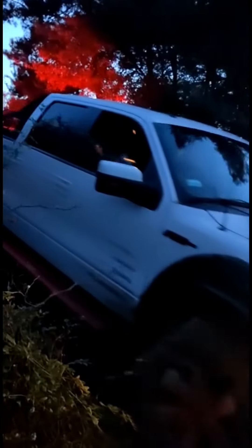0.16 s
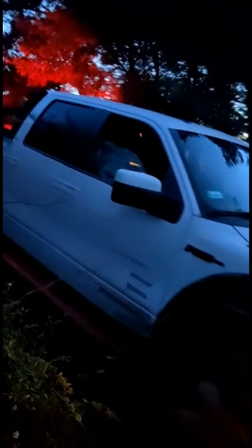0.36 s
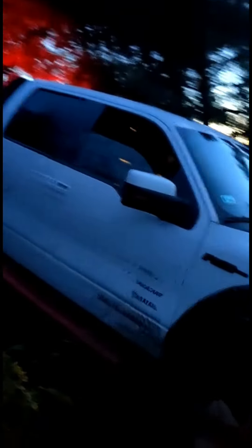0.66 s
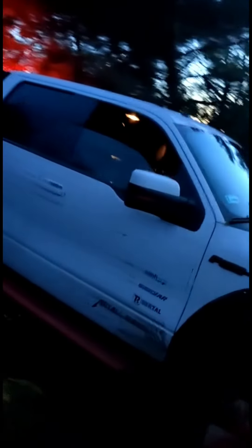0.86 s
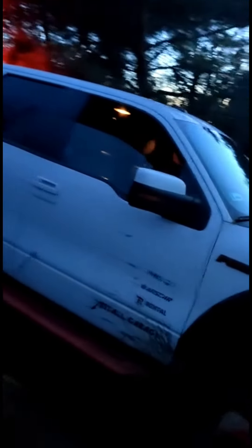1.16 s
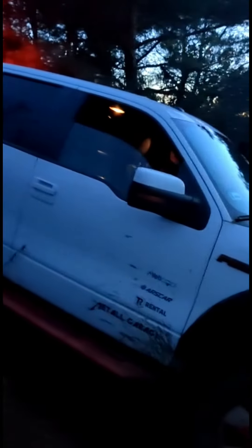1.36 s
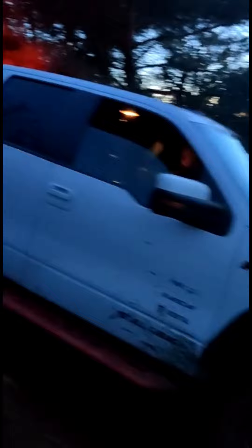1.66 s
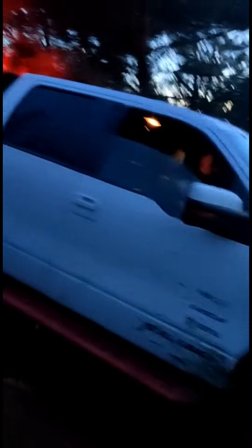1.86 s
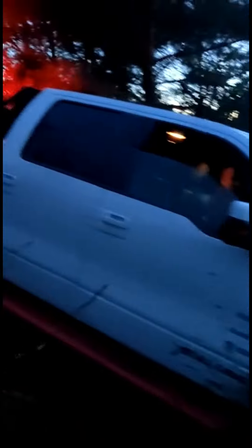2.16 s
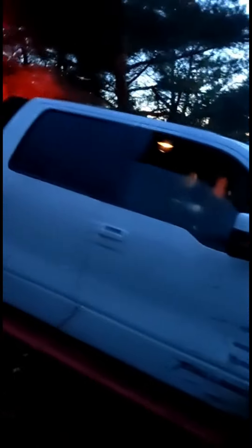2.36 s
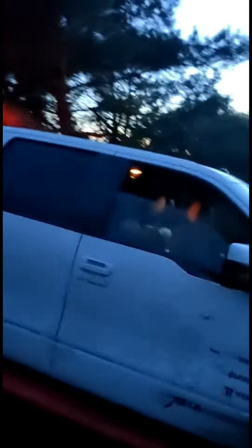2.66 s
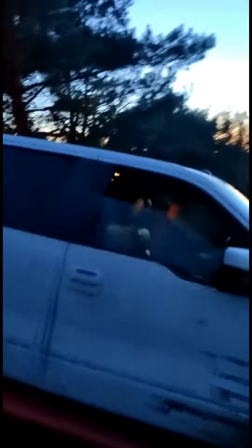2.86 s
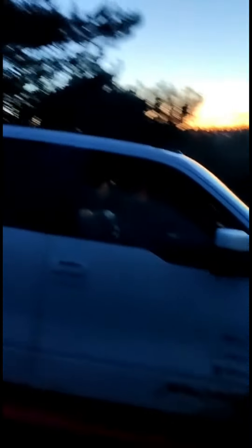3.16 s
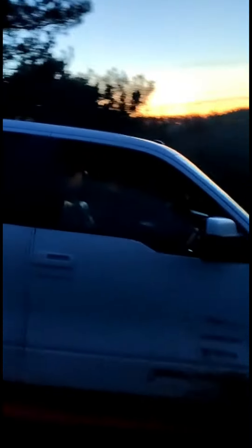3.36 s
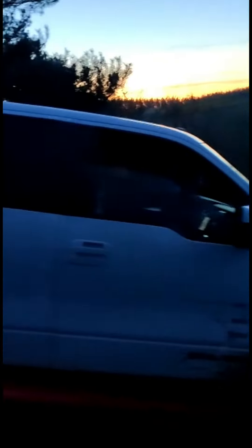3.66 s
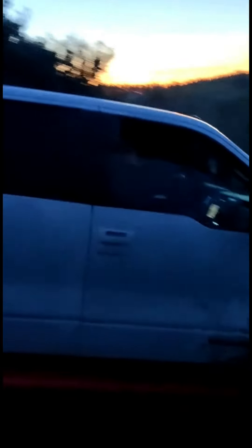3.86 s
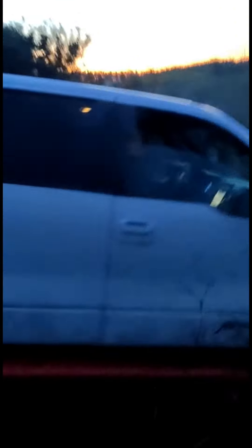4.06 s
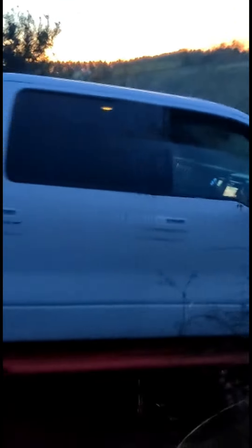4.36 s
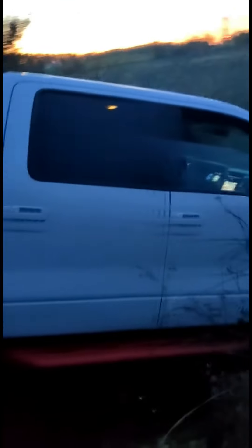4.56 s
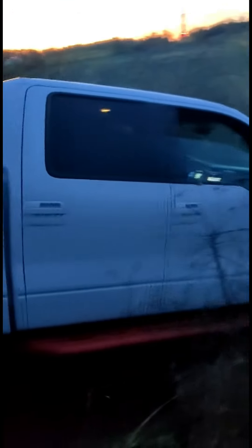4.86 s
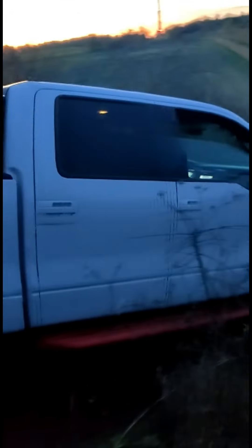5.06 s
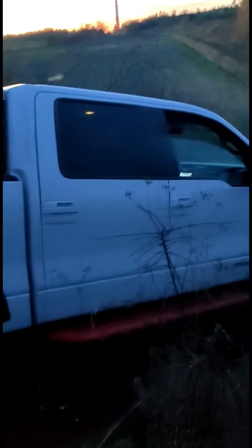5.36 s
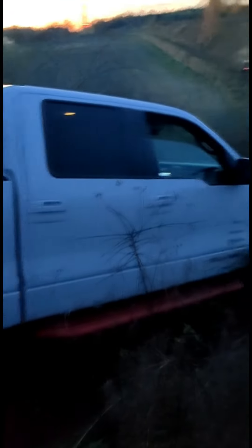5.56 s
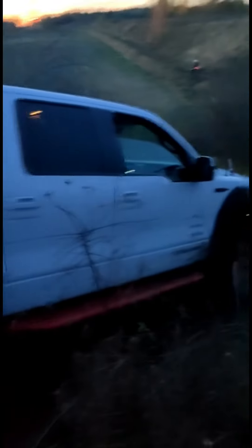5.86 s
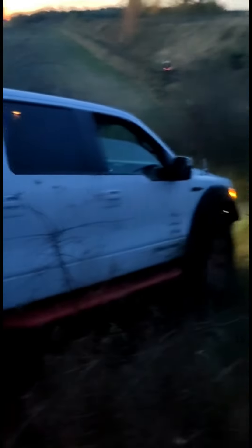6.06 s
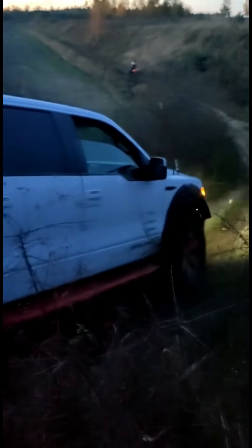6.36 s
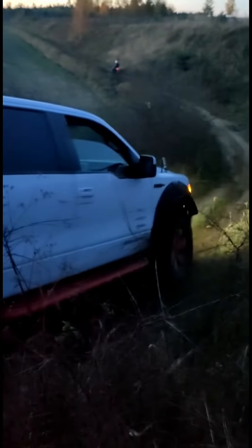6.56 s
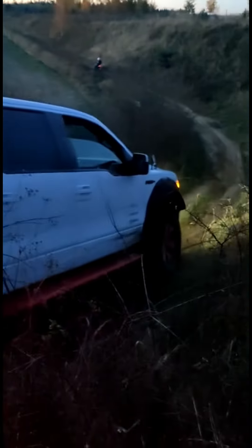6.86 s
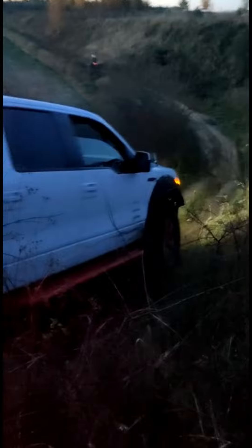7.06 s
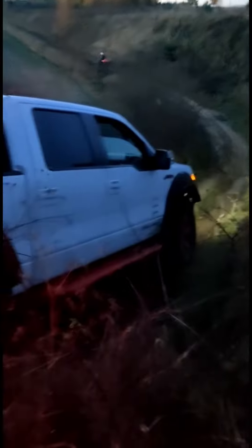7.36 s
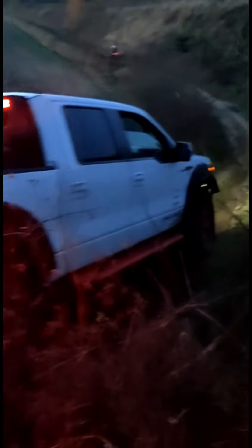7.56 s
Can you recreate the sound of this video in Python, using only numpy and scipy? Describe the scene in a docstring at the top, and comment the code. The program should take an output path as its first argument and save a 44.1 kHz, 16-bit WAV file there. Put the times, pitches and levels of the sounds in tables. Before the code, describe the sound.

Deep uneven truck engine throb swells and sags close by over soft hiss, with sharp twig cracks, grass swish and dull body knocks.

```python
"""A lumpy engine buzz and boom swells and sags over hiss, rustling grass, snapping twigs and body knocks.
A cross-plane V8 pickup creeps through brush a few metres from a phone, its idle hunting up and down.
Even firings make harmonics of the firing rate; the uneven order of the two banks rings the muffler.
Filtered noise makes gas, fan and grass; cracks, scrapes and rings make twigs; decaying modes make knocks."""
import sys
import numpy as np
from scipy import signal
from scipy.fft import rfft, irfft, next_fast_len
from scipy.io import wavfile
from scipy.ndimage import uniform_filter1d

SR = 44100
rng = np.random.default_rng(int(sys.argv[2]) if len(sys.argv) > 2 else 0)


def file_out(sig):
    """Save sig as 16-bit WAV at sys.argv[1]."""
    # one column per channel
    cols = np.atleast_2d(sig).T
    # limit, then scale
    lim = np.clip(cols, -1, 1)
    pcm = np.round(lim * 32767).astype(np.int16)
    wavfile.write(sys.argv[1], SR, pcm)


N = 339570
PORT_LAG = 9  # delay between the two microphone ports, samples
IDLE_HZ = 4.5  # reference engine speed, cycles of two crank turns a second


def undb(db):
    """Amplitude ratio: twenty decibels make a factor of ten."""
    return 10 ** (np.asarray(db) / 20)


def level(x, db):
    """Energy normalisation: the root mean square is set to a level in dB."""
    return x * undb(db) / np.sqrt(np.mean(x ** 2))


def curves(table):
    """Linear interpolation: the columns of a table joined by straight lines in time."""
    s, *columns = np.transpose(table)
    return [np.interp(np.arange(N) / SR, s, c) for c in columns]


def at(table, hz):
    """Spectral envelope: a table of (hz, value) read on a log-frequency axis."""
    table_hz, value = np.transpose(table)
    return np.interp(np.log(hz + 1), np.log(table_hz), value)


def band(x, hz, width_hz):
    """Second-order resonance with gain 1 at its centre."""
    b, a = signal.iirpeak(hz, hz / width_hz, SR)
    return signal.lfilter(b, a, x)


def walk(rate):
    """Slow random modulation: levels held 1 / rate s and slewed twice; spread near 1."""
    k = int(SR / rate)
    steps = np.repeat(rng.standard_normal(N // k + 1), k)
    return 1.62 * uniform_filter1d(uniform_filter1d(steps, k), k)[:N]


def pan(x, db):
    """Level and time difference: left minus right in dB; left lags unless it is at least 3 dB louder."""
    lag = PORT_LAG if db < 3 else -PORT_LAG
    return np.array([np.roll(x, lag) * undb(db / 2), x * undb(-db / 2)])


def coloured(tone, flicker_db, likeness=None, gate=1):
    """Subtractive synthesis: shaped noise whose octave slices each flicker over a shared swell."""
    size = next_fast_len(N)
    hz = np.arange(size // 2 + 1) * SR / size
    common, left, right = rfft(rng.standard_normal((3, size)))
    # share of the power common to both ports
    share = np.clip(at(likeness, hz), 0, 1) if likeness else 1
    late = np.exp(-2j * np.pi * hz * PORT_LAG / SR)
    pair = np.array([common * late, common]) * np.sqrt(share) + np.array([left, right]) * np.sqrt(1 - share)
    pair = pair * undb(at(tone, hz))
    slices = np.floor(np.log2(hz + 1)).astype(int).clip(7, 13)
    swell = walk(3.116)
    out = 0
    for k in range(7, 14):
        flicker = undb(flicker_db * (.4 * swell + walk(14)))
        out = out + irfft(pair * (slices == k), size)[:, :N] * flicker
    return level(out * gate, 0)


def engine_cycle():
    """Rotational inertia: the flywheel smooths the speed, whose integral is the position in the cycle."""
    # engine speed before the flywheel smooths it: start_s, speed_hz (cycles of two crank turns a second)
    speed_table = [(0.0, 4.928), (0.6, 4.732), (1.2, 4.031), (1.5, 3.937), (1.75, 4.199), (2.3, 4.771),
                   (2.6, 4.923), (3.5, 4.457), (3.95, 4.44), (4.45, 4.746), (4.8, 4.632), (5.1, 4.583),
                   (5.5, 4.128), (5.75, 4.025), (6.05, 4.221), (6.5, 4.763), (6.8, 4.778), (7.2, 4.628),
                   (7.7, 4.505)]
    flywheel_s = .2
    # cycle position runs ahead above IDLE_HZ and behind below it, making speed changes a little livelier
    speed_lead_s = .011
    speed = uniform_filter1d(curves(speed_table)[0], size=int(flywheel_s * SR), mode="nearest")
    return speed, np.cumsum(speed) / SR + speed_lead_s * (speed - IDLE_HZ)


def buzz_and_drone(firing, lift_db, second_db):
    """Fourier series: even firings sound at whole multiples of the firing rate, locked to crank angle."""
    # buzz at multiples of the firing rate: multiple, relative_db
    multiples = [(2, 4.5), (3, -3.5), (4, 0), (5, -21)]
    # tone at the firing rate falls behind as the truck's tail swings round: start_s, late_rad
    drone_late = [(0, .1), (4, .3), (6.3, 1.05), (7.7, .85)]
    # tones of the exhaust: start_s, buzz_db, drone_db
    tone_levels = [(0.0, -30, -30), (0.83, -29, -27), (0.96, -29, -34), (1.22, -33, -27), (1.63, -38, -34),
                   (1.97, -31.5, -36), (2.36, -29.5, -23.5), (3.11, -30.5, -25.5), (3.26, -28, -27.5),
                   (4.1, -31, -32.5), (4.22, -32.5, -26.5), (4.57, -26, -23), (4.95, -32.5, -26.5),
                   (5.42, -28.5, -26.5), (5.83, -37, -30), (6.37, -26, -24), (7.57, -32.5, -25.5),
                   (7.7, -28, -25)]
    buzz_lag = 1.3  # how late the buzz peaks, radians of a firing
    buzz_db, drone_db = curves(tone_levels)
    angle = 2 * np.pi * firing - buzz_lag
    buzz = 0
    for k, db in multiples:
        multiple_db = db + lift_db * (k == 4) + second_db * (k == 2) + .6 * walk(8)
        buzz = buzz + undb(multiple_db) * np.sqrt(2) * np.sin(k * angle)
    drone = undb(drone_db) * np.sqrt(2) * np.sin(angle - curves(drone_late)[0])
    return drone + undb(buzz_db) * buzz


def firing_pulses(count):
    """Impulse excitation: one puff per firing, signed by bank, and a stray random part."""
    # bank of each firing in order: sign
    banks = [1, -1, 1, -1, -1, 1, -1, 1]
    # mean strength of each cylinder in firing order: relative_db
    cylinder_db = [1.4, 1.9, 0, -.6, -.6, -1.3, -.6, -.3]
    scatter_db = 1.3  # from firing to firing
    starts = np.flatnonzero(np.diff(count)) + 1
    chance = rng.standard_normal((2, len(starts)))
    puffs, stray = np.zeros(N), np.zeros(N)
    strength_db = np.take(cylinder_db, count[starts], mode="wrap") + scatter_db * chance[0]
    puffs[starts] = np.take(banks, count[starts], mode="wrap") * undb(strength_db)
    stray[starts] = chance[1]
    return puffs, stray


def muffler_boom(puffs):
    """Resonators in series: the uneven bank pattern rings the muffler chambers."""
    # muffler chambers: pitch_hz, width_hz
    chambers = [(61.5, 17), (76, 16)]
    boom = puffs
    for hz, width_hz in chambers:
        boom = band(boom, hz, width_hz)
    return level(boom, 0)


def shell_ring(puffs, count):
    """Once-a-cycle forcing: one cylinder rings each shell resonance, filtered twice."""
    # shell resonances: pitch_hz, filter_width_hz, level_db (relative to the boom)
    shell = [(22.3, 6.1, -17), (146, 23, -14.5)]
    # cylinder that drives each: firing_index
    drivers = [1, 4]
    # outward or inward push: sign
    pushes = [1, -1]
    out = 0
    for k, push, (hz, width_hz, db) in zip(drivers, pushes, shell):
        blow = push * np.abs(puffs) * (count % 8 == k)
        out = out + level(band(band(blow, hz, width_hz), hz, width_hz), db)
    return out


def tailpipe_ring(puffs, stray):
    """Pipe resonance: every firing, of uneven strength and sometimes reversed sign, rings the tailpipe."""
    # pipe resonances: pitch_hz, filter_width_hz (second pass twice as wide), relative_db
    pipe_modes = [(259.6, 35, -4), (328.3, 19, -8.5), (368.6, 39, -15), (477.6, 19, -12.5)]
    blows = np.abs(puffs) * undb(2 * stray) * np.sign(stray + .7)
    # a blow pushes for about a millisecond
    blows = uniform_filter1d(uniform_filter1d(blows, size=40), size=40)
    return sum(level(band(band(blows, hz, width_hz), hz, 2 * width_hz), db) for hz, width_hz, db in pipe_modes)


def stray_growl(stray):
    """Random forcing: stray firing strength excites a broad low resonance."""
    return level(band(band(stray, 179, 70), 179, 70), 0)


def exhaust(cycle, speed):
    """Source and filter: crank-locked tones and firing pulses ring muffler, shell and tailpipe."""
    # rough part, thickest as the engine pulls:
    # start_s, growl_db, tailpipe_db, fourth_multiple_lift_db, second_multiple_lift_db
    pull = [(0, -46, -47, -0.5, 0), (.6, -47, -45.5, -2, 0), (1.03, -41, -44.5, -1.5, -1),
            (1.63, -44, -47.5, 0, 3), (2.3, -39, -44, 1.5, -1), (2.64, -43, -46, 0, -1),
            (2.95, -51, -44.5, -3, -1), (3.3, -42, -45.5, -2, -1), (4.1, -45, -42.5, 1, 0),
            (4.55, -36, -41, 2, -3), (4.9, -47, -44.5, 0.5, 0), (5.3, -43, -46, -1.5, -2),
            (5.8, -52, -46, -1.5, 1), (6.15, -44, -42, 0.5, -3), (6.6, -36, -41.5, 2, -4),
            (6.95, -43.5, -46, 0.5, -3), (7.25, -50, -47, 0.5, -2), (7.7, -48, -44, -0.5, -2)]
    first_firing = .1485  # share of a cycle before the first firing
    # the boom swells with engine speed, a little late
    boom_idle_db, boom_db_per_hz, boom_late_s = -22.8, 1.5, 0.15
    t = np.arange(N) / SR
    boom_db = boom_idle_db + boom_db_per_hz * (np.interp(t - boom_late_s, t, speed) - IDLE_HZ)
    growl_db, pipe_db, lift_db, second_db = curves(pull)

    firing = 8 * (cycle - first_firing)
    count = np.floor(firing).astype(int)
    puffs, stray = firing_pulses(count)
    tones = buzz_and_drone(firing, lift_db, second_db)
    boom = (muffler_boom(puffs) + shell_ring(puffs, count)) * undb(boom_db)
    rough = stray_growl(stray) * undb(growl_db) + tailpipe_ring(puffs, stray) * undb(pipe_db)
    return pan(tones + boom + rough, -.35), firing % 1


def knocks():
    """Modal synthesis: a soft blow rings the modes of a body panel, which decay exponentially."""
    # knocks on the body: start_s, nominal_peak_db, ring_hz, t60_s
    blows = [(.592, -28, 435, 0.048), (.807, -38, 454, 0.17), (.997, -39, 794, .06),
             (1.011, -29.5, 820, 0.051), (1.2, -40, 886, 0.053), (1.725, -35, 482, 0.07),
             (1.968, -39, 945, 0.073), (2.14, -45, 805, 0.055), (3.035, -30, 880, 0.058),
             (3.064, -33, 834, 0.038), (4.334, -41, 784, 0.1), (4.537, -30, 960, .02),
             (4.852, -36, 950, 0.045), (4.87, -46, 740, .1), (5.186, -40, 713, 0.06), (6.2, -47, 940, .15),
             (7.5, -44, 800, 0.085)]
    # modes of a panel: multiple (of its ring), relative_db
    panel = [(1, 2), (1.13, -10.5), (.86, -10.5), (2.37, -12)]
    # faint taps of stems between the knocks
    tap_count, tap_hz, tap_t60_s = 60, (420, 1400), .05
    tap_floor_db, tap_spread_db = -53, 3.5
    rise_s = 0.004
    t = np.arange(8000) / SR
    out = np.zeros(N + len(t))
    when, size, pitch = rng.random((tap_count, 3)).T
    tap_s = when * N / SR
    tap_db = tap_floor_db - tap_spread_db * np.log(1 - size)
    tap_pitch_hz = np.geomspace(*tap_hz, num=50)[(50 * pitch).astype(int)]
    taps = zip(tap_s, tap_db, tap_pitch_hz, [tap_t60_s] * tap_count)
    for s, peak_db, hz, t60_s in [*blows, *taps]:
        modes = sum(undb(db) * np.sin(2 * np.pi * k * hz * t) for k, db in panel)
        decay = undb(peak_db - 60 * t / max(t60_s, .01))
        ring = modes * decay * (1 - np.exp(-t / rise_s))
        first = int(s * SR)
        out[first:first + len(t)] += np.sqrt(2) * ring
    return pan(out[:N], 0.5)


def twigs():
    """Fracture: a sharp crack over a short scrape and its tail, as a ring and three noise bands."""
    # snaps: start_s, nominal_peak_db, ring_hz, top_minus_peak_db, left_minus_right_db, tail_t60_ms
    snaps = [(1.0196, -50, 4500, -1, -6, 30), (1.14, -50, 2400, -20, 14, 18),
             (1.2032, -50, 2030, -20, 8, 15), (1.5224, -57, 3000, 4, -6, 15),
             (1.7903, -56, 4000, 6, -7, 20), (2.1475, -41, 3000, -2, -12, 17),
             (2.276, -46, 2490, -18, 18, 16), (2.2945, -27.5, 4060, -11, -6, 5),
             (2.38, -56, 4000, 4, -8, 20), (2.6399, -53, 4500, -1, -8, 20),
             (2.752, -43, 2180, -39, 31.5, 14), (2.865, -40.5, 3000, -30, 27, 11),
             (3.1155, -29.5, 3500, -6, -4, 10), (3.123, -30, 3000, -20, -6, 36),
             (3.321, -46.5, 2200, -18, 18.5, 54), (3.3318, -55, 4500, 6, -10, 15),
             (3.439, -49.5, 2490, -29, 22, 43), (3.5545, -39.5, 2600, -22, 18, 7.9),
             (3.62, -53, 1250, -40, 12, 56), (3.717, -57, 4000, 7, -9, 12),
             (3.779, -50.5, 2600, -30, 18, 27), (3.8365, -40.5, 2460, -34, 29, 7.9),
             (3.8996, -44, 2050, -30, 17.5, 50), (3.965, -40.5, 1600, -22, 11, 32),
             (3.9943, -56, 4000, 5, -7, 40), (4.2415, -39, 3500, -20, 12, 8.2),
             (4.3779, -57, 4000, 7, -11, 20), (4.4827, -56, 4000, 11, -12, 20),
             (4.527, -42, 2500, 0, 12, 14), (4.5358, -49, 4500, 2, -16, 30), (4.5388, -33, 5600, 0, -20, 3),
             (4.5505, -43, 3000, -4, 7, 20), (4.6698, -58, 4000, 10, -11, 70),
             (4.956, -43, 3580, -10, -3, 46), (5.0215, -54, 4000, 9, -14, 60),
             (5.0327, -38.5, 3800, -6, -8.5, 58), (5.187, -41, 3800, -10, 2, 18),
             (5.2415, -59, 4000, 12, -11, 25), (5.452, -60, 4000, 8, -11, 20),
             (5.8887, -52, 3500, 1, -12, 53), (6.059, -51, 3500, 9, -5, 25), (6.773, -45, 4000, 4, -7, 24),
             (6.8518, -59, 4000, 6, -12, 30), (7.196, -42.5, 4030, 3.5, -6, 81),
             (7.2387, -54, 4000, 9, -8, 25), (7.281, -48, 4000, 9, -6, 85), (7.3647, -54, 4000, 7, -6, 40)]
    # twigs on the left lie behind the truck and are duller
    centre_treble_db, duller_db_per_pan_db = -8.5, 0.8448
    scrape_share = 0.2  # the scrape holds for this share of the tail
    ring_share = 0.85  # filter width of the ring as a share of its pitch
    crack_db = 3  # the break itself, over the scrape
    # low body under the ring spreads to both ports: a share of the twig's pan, plus a lean to the left
    wood_db, wood_pan_share, wood_lean_db = -2, .55, 8

    def unit(x):
        """Peak normalisation: the largest swing is 1."""
        return x / np.abs(x).max()

    noise = rng.standard_normal(N)
    edges_hz = [(5000, 7600), (8500, 15500), (600, 2200)]  # treble, top, wood
    filters = [signal.butter(3, e, "band", fs=SR, output="sos") for e in edges_hz]
    treble, top, wood = [level(signal.sosfilt(f, noise), -9.3) for f in filters]
    before = 2 * PORT_LAG  # silent samples ahead of the snap leave room for the lag
    age_ms = (np.arange(6000) - before) / SR * 1000
    click = 1. * (age_ms == 0)
    treble_crack, top_crack, wood_crack = [unit(signal.sosfilt(f, click)) for f in filters]
    out = np.zeros((2, N))
    for s, peak_db, hz, top_db, pan_db, tail_ms in snaps:
        first = int(s * SR) - before
        span = slice(first, first + len(age_ms))
        tail_age_ms = np.clip(age_ms - scrape_share * tail_ms, 0, None)
        scrape = undb(-60 * tail_age_ms / max(tail_ms, 2)) * (age_ms >= 0)
        width_hz = ring_share * hz
        ring = level(band(band(noise[span], hz, width_hz), hz, width_hz), -8.3)
        ring_crack = unit(band(band(click, hz, width_hz), hz, width_hz))

        body = (wood[span] * scrape + undb(crack_db) * wood_crack) * undb(peak_db + wood_db)
        out[:, span] += pan(body, wood_pan_share * pan_db + wood_lean_db)
        treble_db = centre_treble_db - duller_db_per_pan_db * pan_db
        # the left port is shaded from the treble: sound, crack, relative dB, left shade dB
        parts = [(ring, ring_crack, 0, 0),
                 (treble[span], treble_crack, treble_db, -5),
                 (top[span], top_crack, top_db, -9)]
        for sound, crack, db, shade_db in parts:
            part = (sound * scrape + undb(crack_db) * crack) * undb(peak_db + db)
            out[:, span] += pan(part, pan_db) * undb([[shade_db], [0]])
    return out


def branch_swipe():
    """Friction noise: a branch dragged by gives resonant noise with a rapid random roughness."""
    # one swipe: start_s, ease_s, end_s, level_db (before roughness and envelope)
    swipe = (4.179, 4.2, 4.222, -31.5)
    attack_s, release_s, ease_db = .008, 0.012, -5
    start, ease, end, swipe_db = swipe
    noise, t = rng.standard_normal(N), np.arange(N) / SR
    drag = np.interp(t, [start, start + attack_s, ease, ease + attack_s / 2, end, end + release_s],
                     [0, 1, 1, undb(ease_db), undb(1.5 * ease_db), 0])
    drag = drag * undb(1.6 * walk(430))
    rasp = band(band(noise, 6850, 940), 6200, 1200)
    rasp = rasp + 0.38 * band(noise, 3220, 510) + 0.26 * band(noise, 5400, 1200)
    rasp = rasp + 0.11 * band(noise, 11800, 1500) + 0.035 * noise
    low = level(band(noise, 1500, 2600), swipe_db - 5.5)
    return pan(level(rasp, swipe_db) * drag, -15.0) + pan(low * drag, 1.5)


def grass():
    """Granular noise: dense tiny grains of uneven size make a swish and a finer crackle."""
    # grass brushing past: start_s, swish_db, crackle_db
    brush = [(0, -64.5, -71), (.4, -61.5, -63), (.65, -63.5, -63), (1.05, -65.5, -68), (1.7, -60.5, -64),
             (2.1, -63.5, -63), (2.7, -57.5, -65.5), (3.2, -57, -65), (3.8, -61.5, -67), (4.4, -57, -60),
             (4.74, -64, -62.5), (5.08, -58.5, -53.5), (5.3, -63.5, -59), (5.6, -67, -62.5),
             (6.37, -62, -60), (6.85, -71.5, -62), (7.1, -66.5, -63), (7.7, -69, -68)]
    # spectra: pitch_hz, relative_density_db (per Hz)
    swish_tone = [(1500, -2.5), (3500, 6.5), (6800, 14), (7600, 5.5), (8200, -47)]
    crackle_tone = [(3000, 2.5), (7500, -39), (9500, -8), (12000, -2.5), (15000, -5)]
    pan_db = -17.5  # left minus right
    likeness = [(1000, .2), (15000, .2)]  # (Hz, share common to both ports)
    sizes = np.repeat(rng.exponential(size=N // 64 + 1), 64)[:N]
    grains = uniform_filter1d(undb(1.5 * sizes), size=48)
    swish_db, crackle_db = curves(brush)
    swish = coloured(swish_tone, 1.2, likeness, grains) * undb(swish_db)
    crackle = coloured(crackle_tone, 1.9, likeness, grains) * undb(crackle_db)
    return (swish + crackle) * undb(np.array([[.5], [-.5]]) * pan_db)


def stem_squeaks():
    """Friction resonance: stems dragged along the paint squeak in narrow bands of noise."""
    # drags along the body: start_s, end_s, level_db (before panning), squeak_hz
    drags = [(6.093, 6.212, -68, 4460), (6.338, 6.413, -68.5, 4000), (6.507, 6.53, -66.5, 3600),
             (6.764, 6.995, -66.5, 4000), (7.015, 7.114, -71, 4140), (2.87, 2.912, -67, 4500)]
    noise, t = rng.standard_normal(N), np.arange(N) / SR
    out = 0
    for start, end, db, hz in drags:
        squeak = band(noise, hz, 35) + .25 * band(noise, 1.15 * hz, 50) + .7 * band(noise, 1.4 * hz, 60)
        squeak = squeak + .3 * band(noise, 1.1 * hz, 2000) + .6 * band(noise, 2.65 * hz, 90)
        envelope = np.interp(t, [start, start + 0.0046, end, end + 0.0044], [0, 1, 1, 0])
        out = out + level(squeak, db) * envelope
    return pan(out, -33.0)


def gas(phase):
    """Turbulence: gas rush, fan and valve gear hiss, pulsing a little with each firing."""
    # spectrum of the hiss: pitch_hz, relative_density_db (per Hz)
    gas_tone = [(100, -25), (170, -9.5), (230, -14), (383, -13), (549, -26), (651, -21.5), (1580, -30),
                (2160, -29), (2650, -33), (6060, -39.5), (7050, -49), (8050, -47), (9540, -45.5),
                (14500, -57), (15600, -62)]
    # coherence of the ports: pitch_hz, common_share
    gas_likeness = [(100, 0.85), (300, 1), (700, 0.72), (2000, 0.3), (8000, 0.11)]
    # shading of the ports: pitch_hz, left_minus_right_db
    port_shade = [(60, 3), (110, -23), (200, 3), (380, -3), (700, 2.5), (1290, 0), (2380, -3.5),
                  (4400, 0.5), (8120, -4.5), (15000, -8)]
    # gas and fan: start_s, level_db (before shading)
    hiss_levels = [(0, -41.5), (.75, -40.5), (1.7, -42), (2.6, -42), (4.1, -43), (4.8, -43), (5.7, -43.5),
                   (6.3, -44.5), (7, -44), (7.7, -44.5)]
    pulse = 1 + 0.069 * np.cos(2 * np.pi * phase)
    hiss = coloured(gas_tone, 1.0, gas_likeness, pulse)
    hz = np.fft.rfftfreq(N, 1 / SR)
    shade = undb(np.outer([.5, -.5], at(port_shade, hz)))
    return irfft(rfft(hiss) * shade, N) * undb(curves(hiss_levels)[0])


def belt_whirr():
    """Narrow-band noise: belt-driven gear whirrs at fixed resonances with wandering levels."""
    # resonances: pitch_hz, width_hz, base_level_db
    whirr_bands = [(885.4, 35, -63), (2048, 12, -63), (1327, 68, -68)]
    # shared swell: start_s, gain_db
    whirr_swell = [(0, 1), (2.3, 3.5), (3, -2), (5.2, -3), (6, 3.5), (7, 0.5), (7.7, -4)]
    whirr = 0
    for hz, width_hz, db in whirr_bands:
        tone = level(band(rng.standard_normal(N), hz, width_hz), db)
        whirr = whirr + tone * undb(2 * walk(5))
    return pan(whirr * undb(curves(whirr_swell)[0]), -6.0)


def scene():
    """Superposition: the pressures of all sources add at the two ports."""
    speed, cycle = engine_cycle()
    pipe, phase = exhaust(cycle, speed)
    engine = pipe + gas(phase) + belt_whirr()
    brush = grass() + stem_squeaks() + twigs() + branch_swipe()
    return engine + brush + knocks()


def record(dry):
    """Band limiting: the phone cuts the top with a steep elliptic low-pass."""
    top_hz = 15700
    return signal.sosfilt(signal.ellip(10, .2, 70, top_hz, fs=SR, output="sos"), dry)


dry = scene()
out = record(dry)
file_out(out)
```